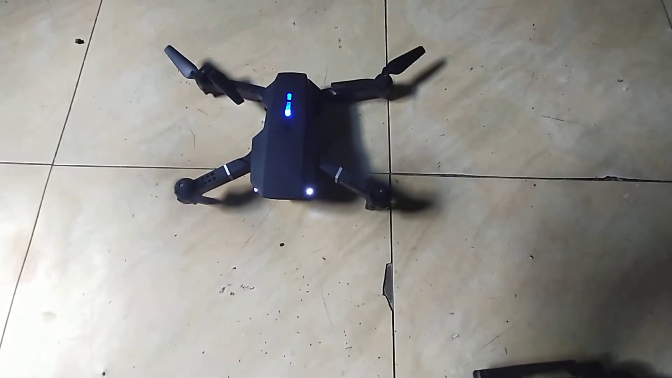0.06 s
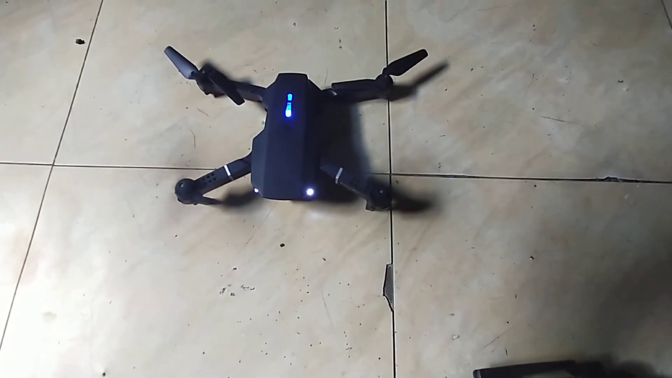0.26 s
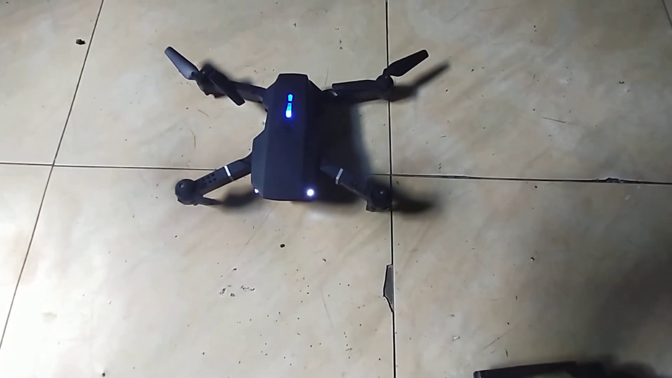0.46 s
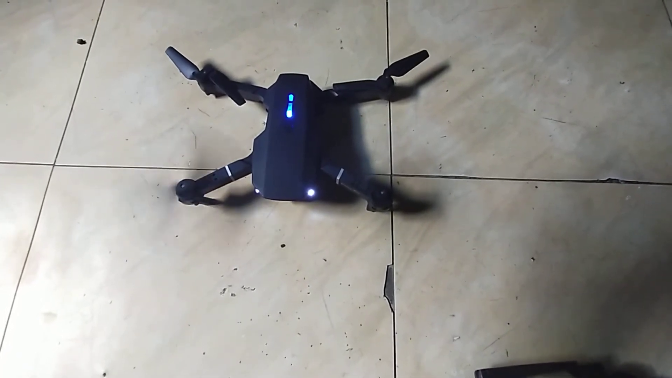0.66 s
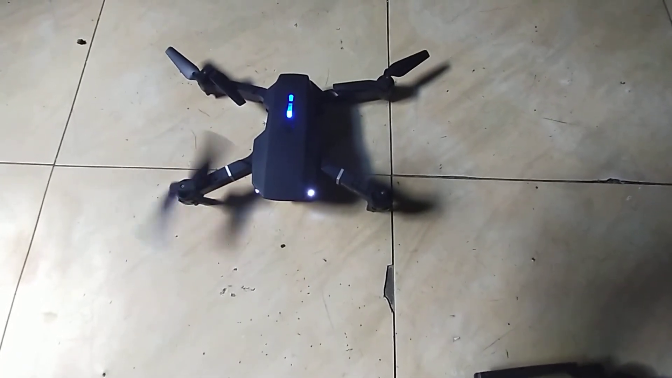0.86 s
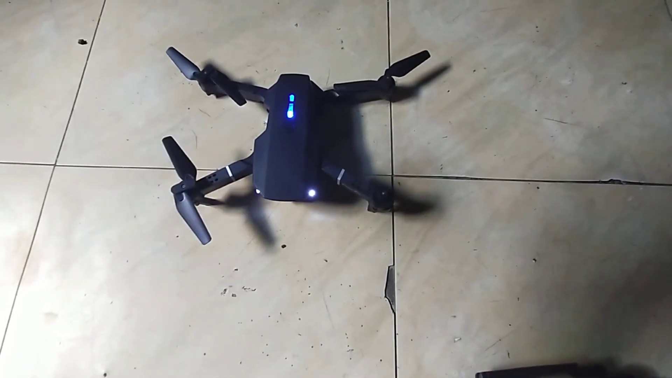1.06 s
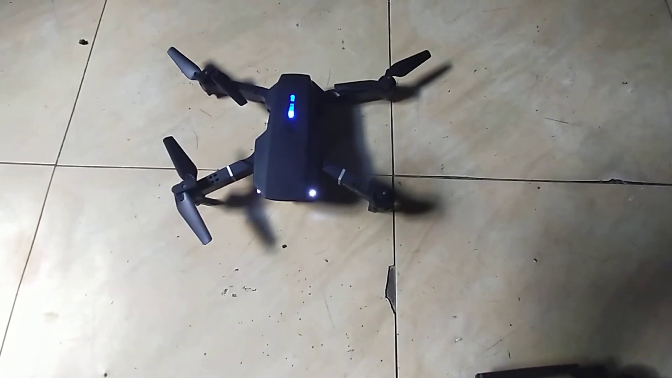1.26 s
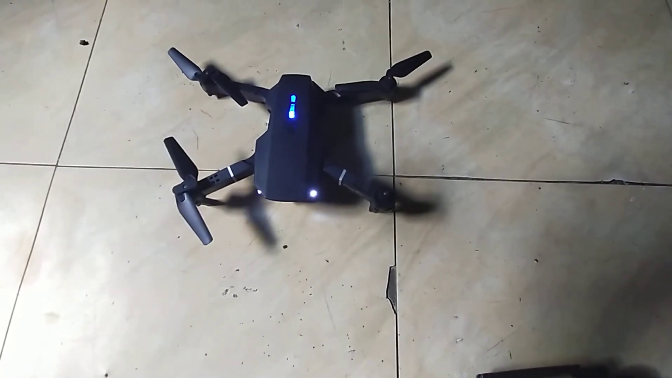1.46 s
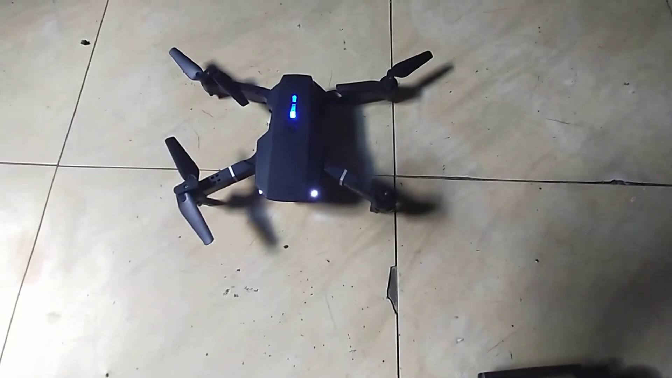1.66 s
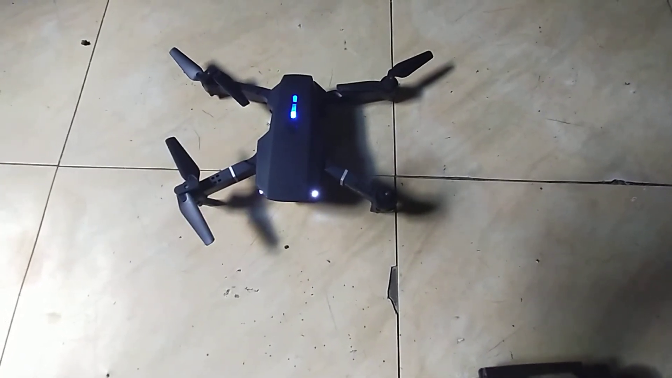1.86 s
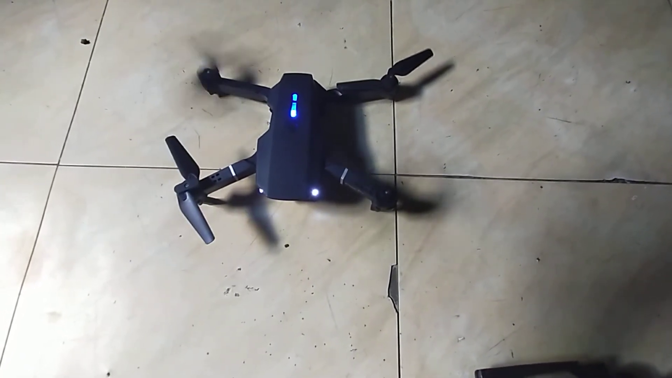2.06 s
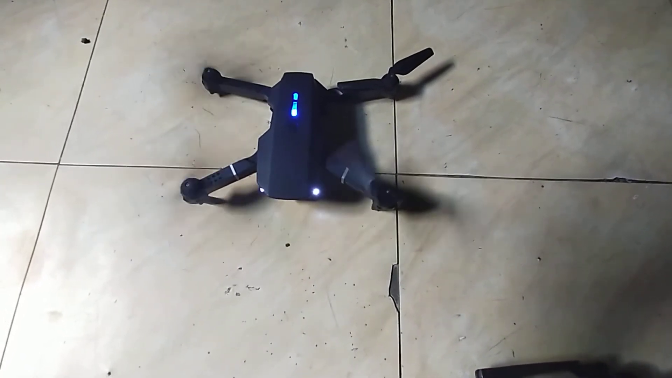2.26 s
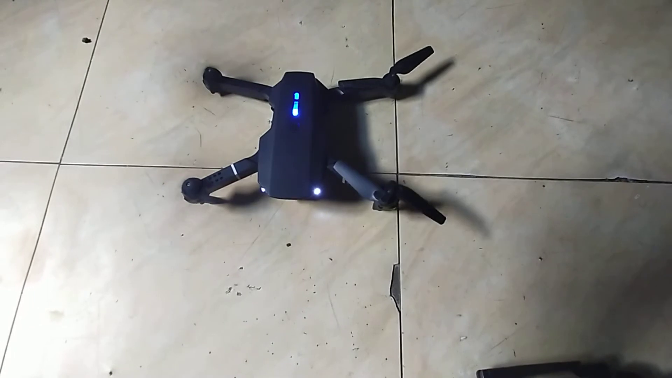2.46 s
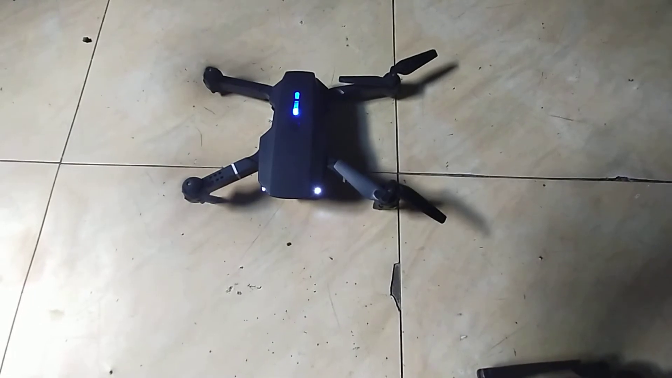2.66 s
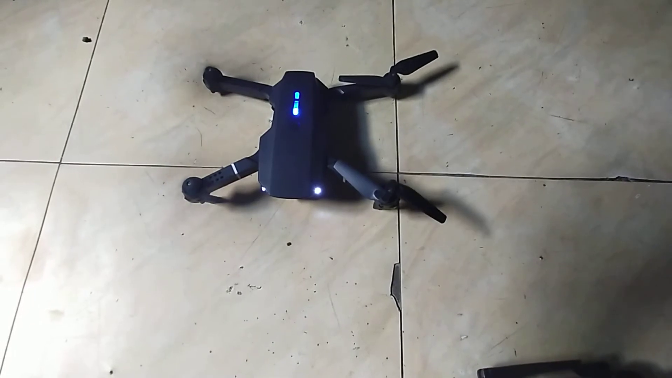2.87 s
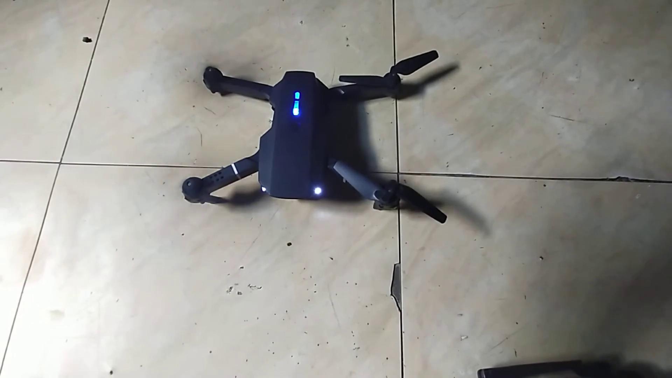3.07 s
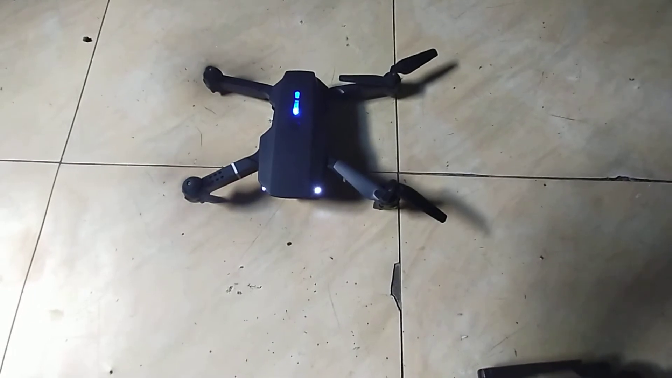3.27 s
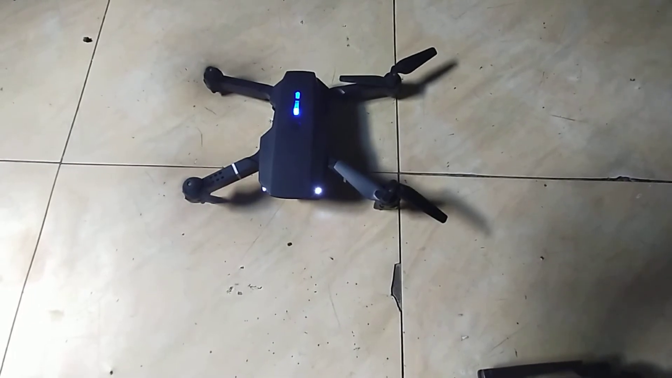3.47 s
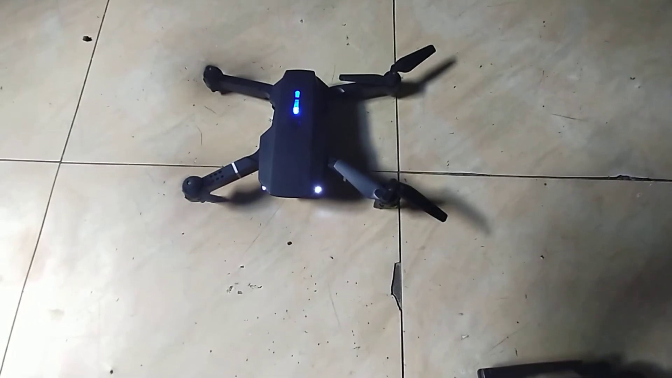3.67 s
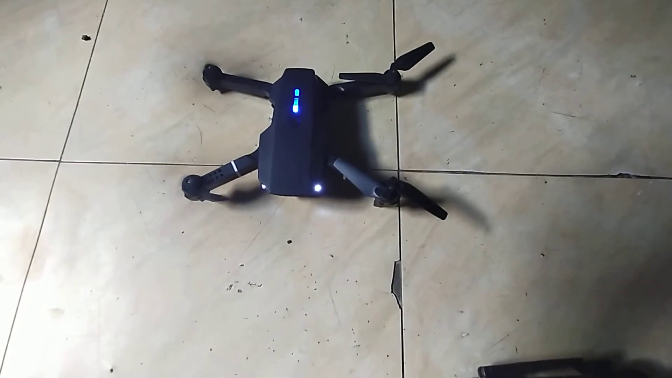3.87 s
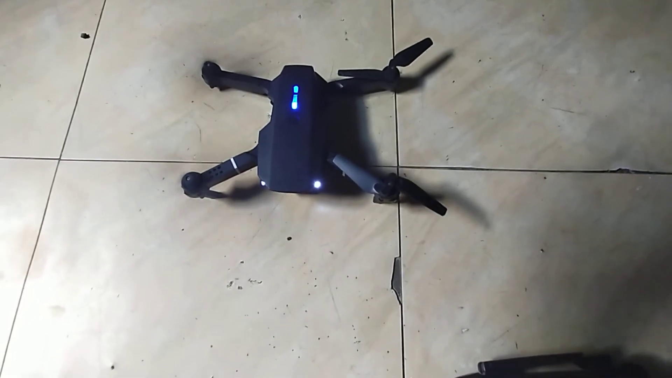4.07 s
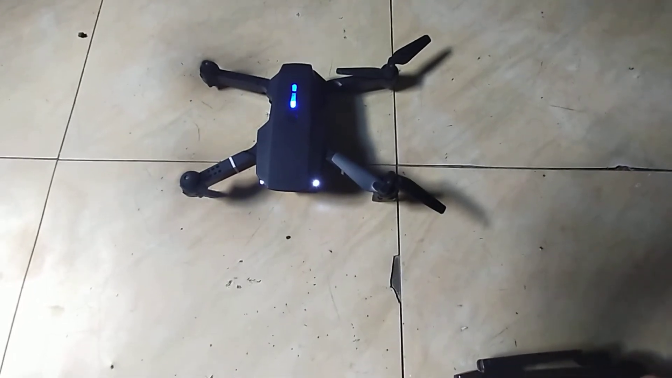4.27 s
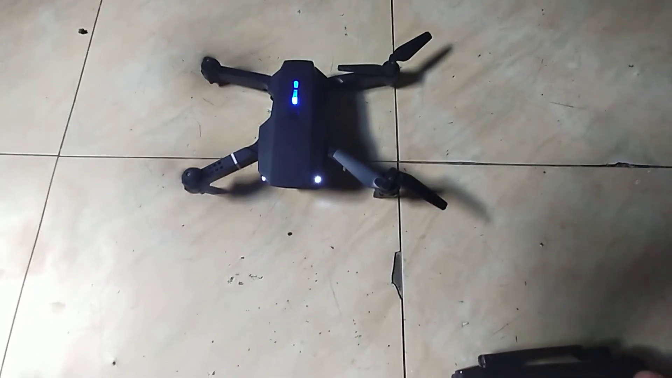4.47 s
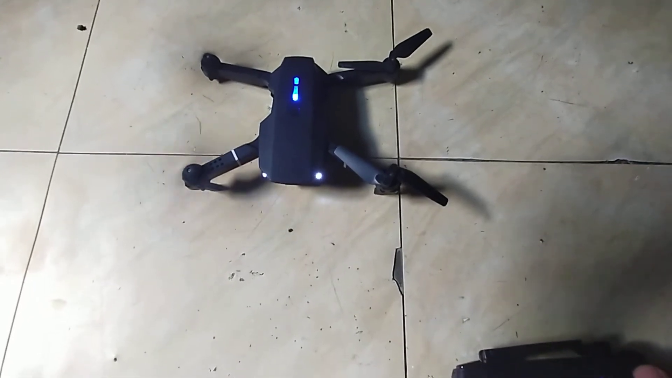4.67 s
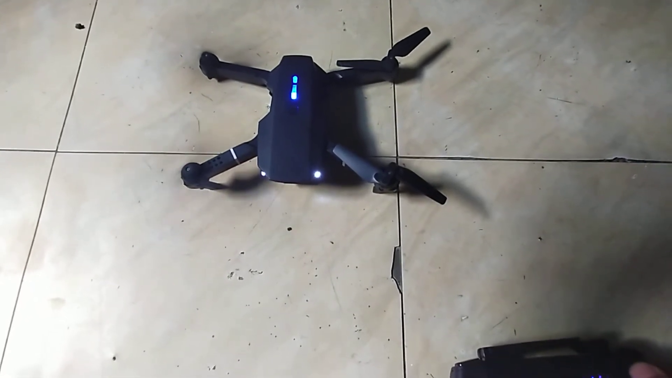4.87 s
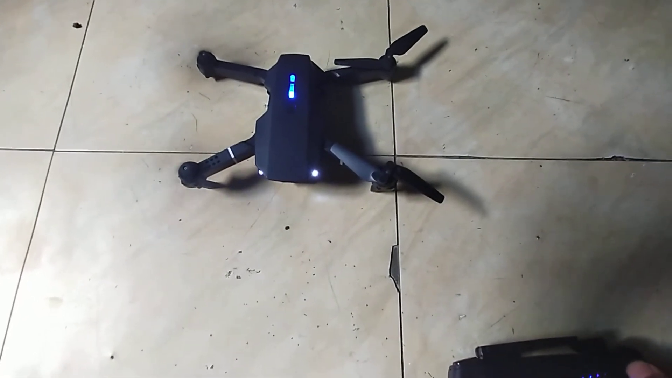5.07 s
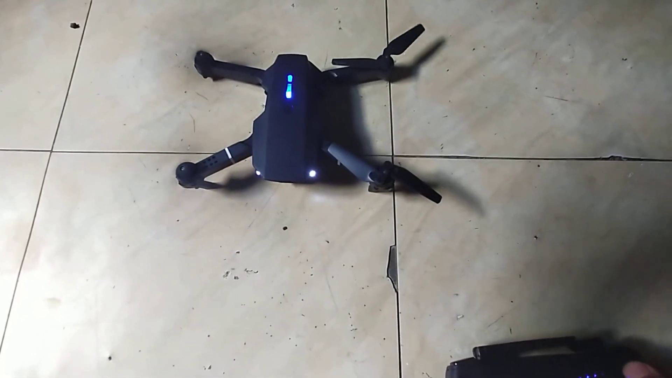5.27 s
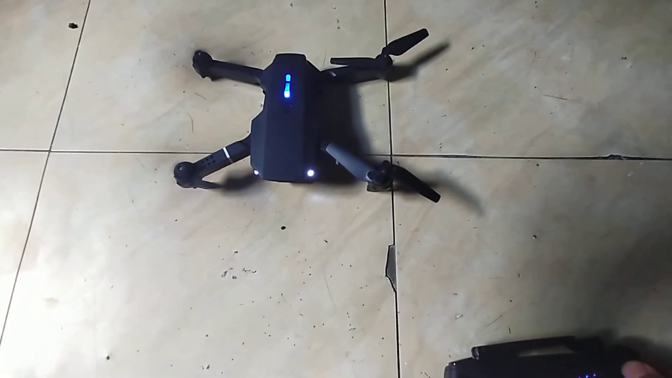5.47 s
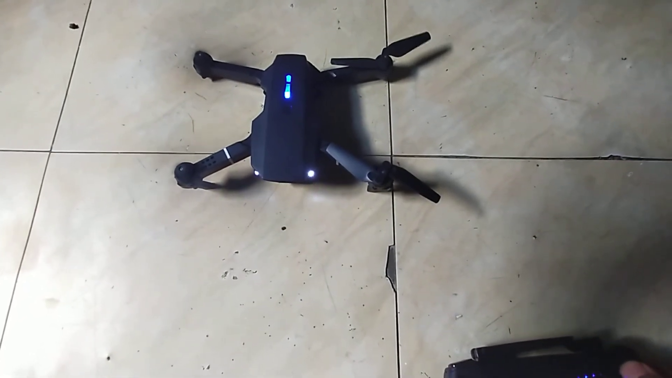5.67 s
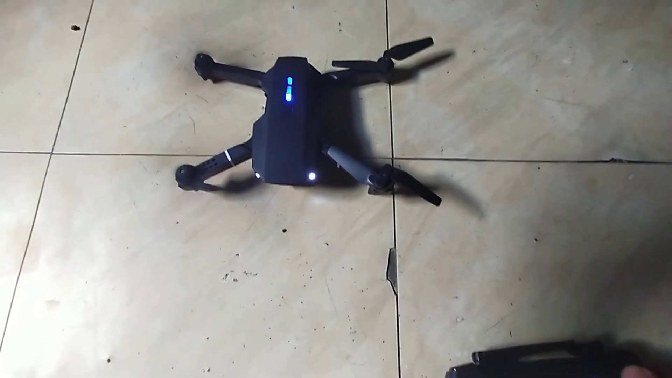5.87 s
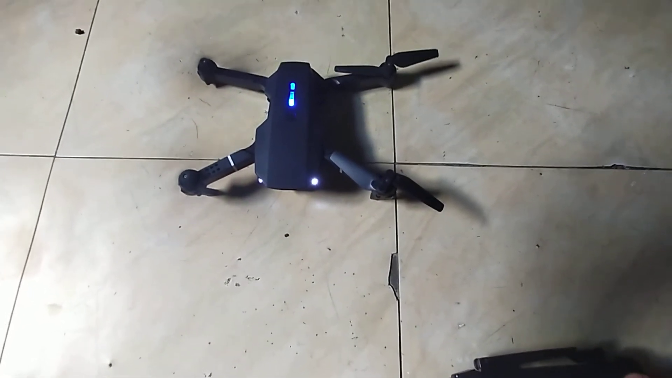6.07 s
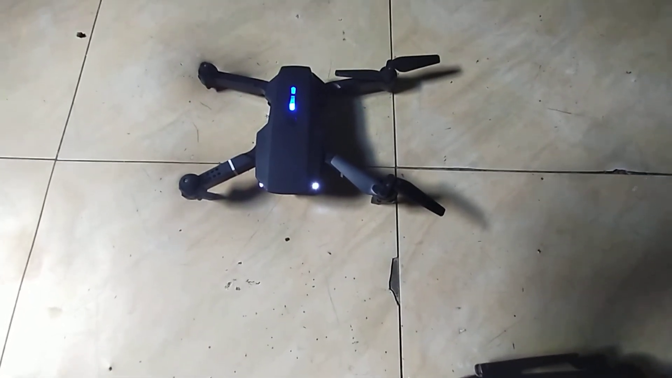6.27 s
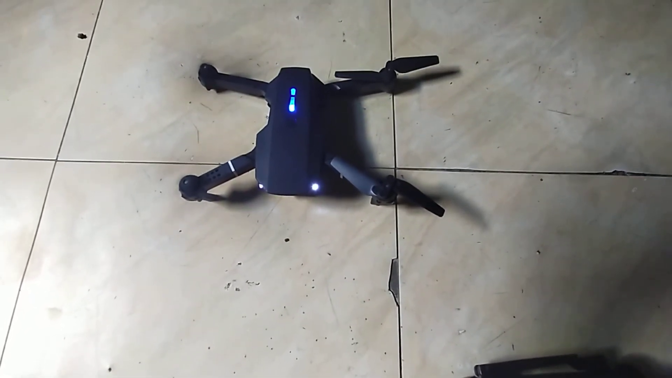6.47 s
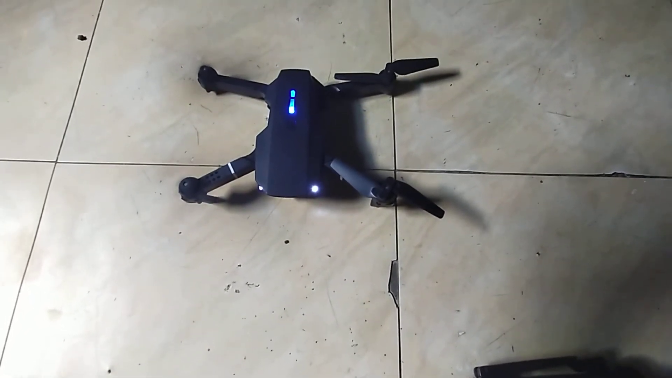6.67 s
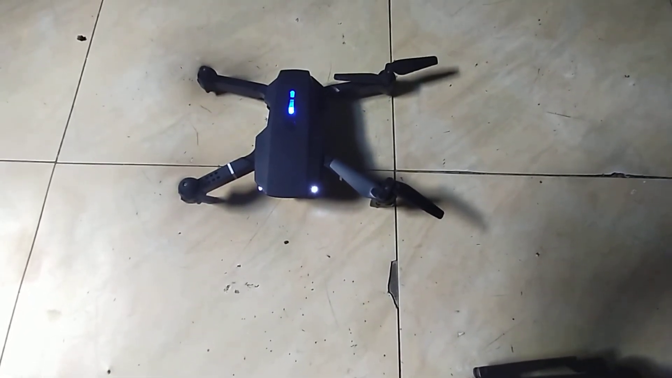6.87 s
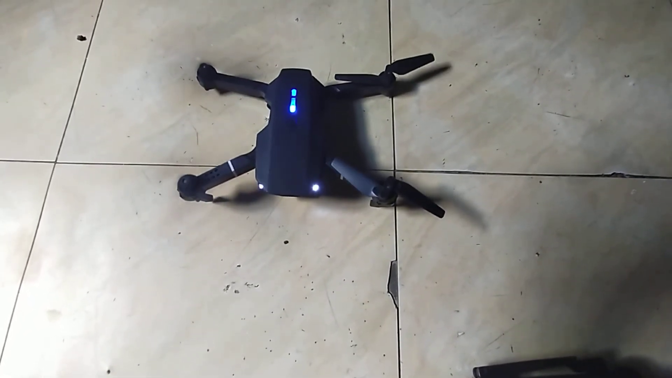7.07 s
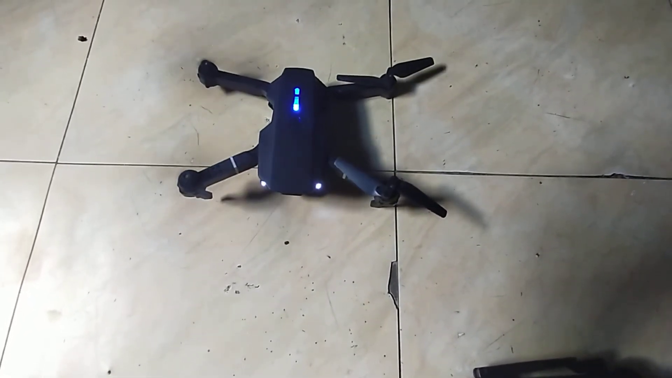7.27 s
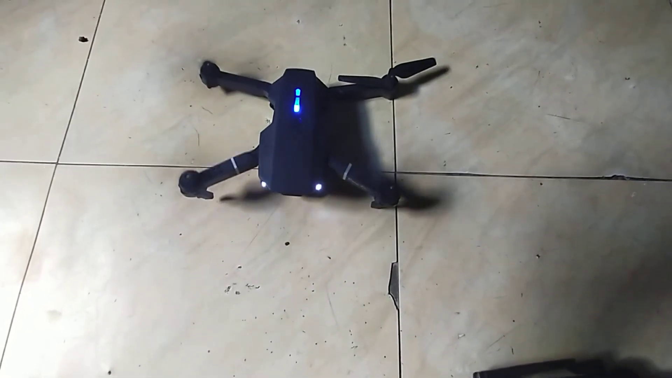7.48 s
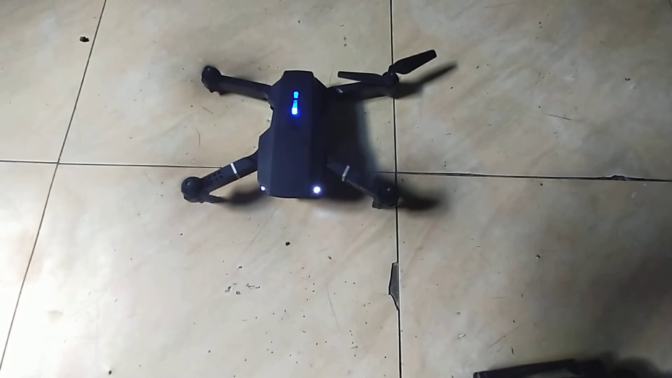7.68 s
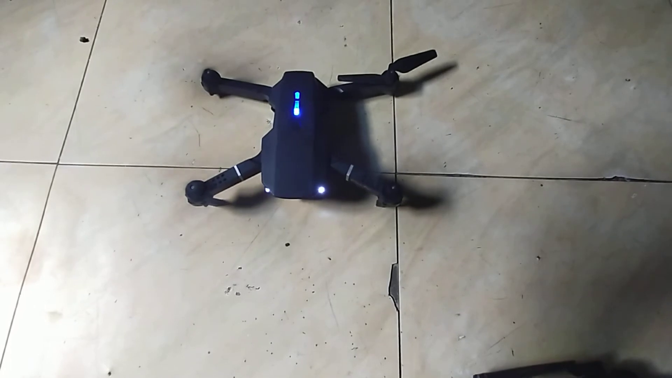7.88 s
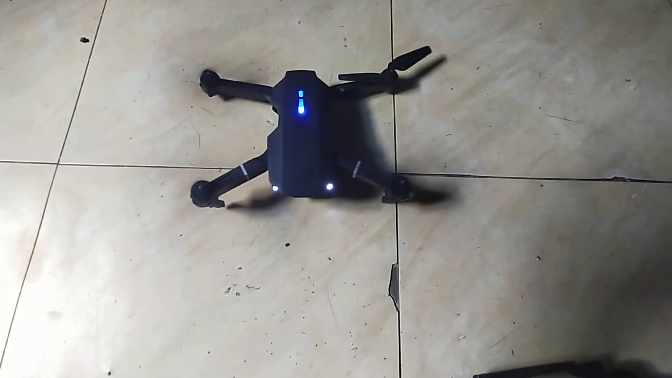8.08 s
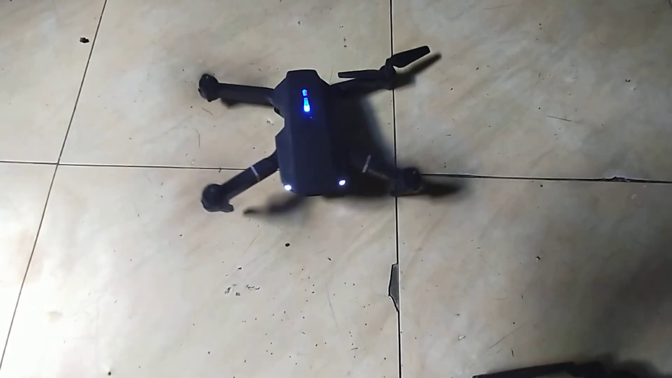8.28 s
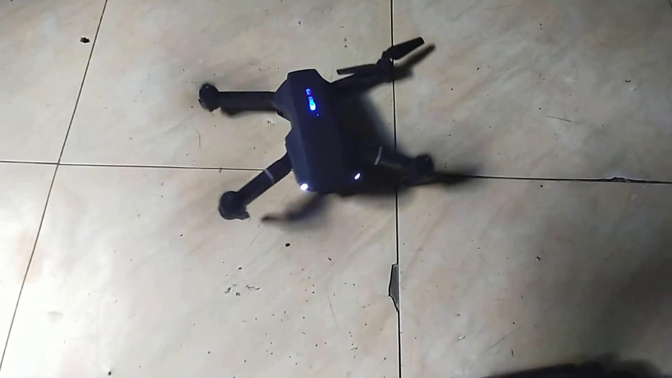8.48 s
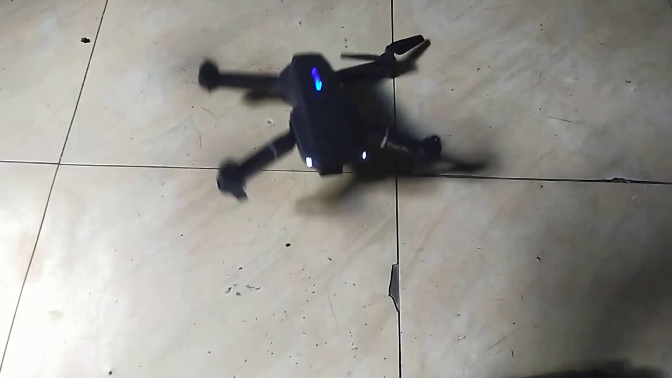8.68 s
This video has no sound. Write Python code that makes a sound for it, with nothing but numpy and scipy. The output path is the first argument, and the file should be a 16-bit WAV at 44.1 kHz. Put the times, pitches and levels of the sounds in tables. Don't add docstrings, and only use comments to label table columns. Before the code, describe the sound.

A small plastic quadcopter on a tiled floor, heard close and dry over faint room hum. From 0 s a geared rotor loses power, its nasal whine sliding down unevenly amid gritty rattle and crackle; by 1.6 s it is loose, slow and faint, with a tiny tick near 1.9 s, nearly silent at 2.1. At 2.2 s hard plastic knocks and short pings burst as a stalled rotor jerks, breaking free at 2.36 and clicking at 2.4. It whirs up fast, peaks near 2.7, sags, and from 3.5 to 5 s holds a rough, throbbing buzz with sizzling highs and a thin fuzzy whistle stuttering above. From 5 s it climbs in steps, steadies around 6.4 to 6.9, then rises strongly to 7.5. At 7.6 it winds down while a third rotor jumps in; a fourth joins at 7.9, racing upward with air wash until the abrupt end at 8.7.

```python
import sys
import numpy as np
from scipy import signal
from scipy.fft import rfft, irfft, next_fast_len
from scipy.io import wavfile
from scipy.ndimage import map_coordinates

SR = 44100
rng = np.random.default_rng(int(sys.argv[2]) if len(sys.argv) > 2 else 0)


def int16_out(signal):
    q = np.round(np.clip(np.atleast_2d(signal).T, -1, 1) * 32767)
    wavfile.write(sys.argv[1], SR, q.astype(np.int16))


def linear_from_db(decibels):
    return 10 ** (np.asarray(decibels, float) / 20)


N = 385434

# (pinion [dB], commutator [dB], second whine [dB], grind [dB])
VOICES = [
    (-62, -39, -42, -7.5),
    (-57.5, -46, -43, -6.5),
    (-59.5, -35.5, -32.5, -6),
    (-54.5, -47.5, -37, -8.5),
]
# (multiple of the rotor [1], level [dB])
COMMUTATOR = [(19, -8), (20, 2), (21, -23)]
# (frequency [Hz], gain [dB])
COMMUTATOR_PATH = [(900, -60), (1080, -19), (1170, -17.5), (1300, 3), (1380, -1), (1500, -3.5),
                   (1580, -15.5), (1750, -10)]
# (multiple of the rotor [1], level [dB])
WORN_GEAR = [(27, -25), (28, -6), (29, -45)]
# (multiple of the rotor [1], level [dB])
DOUBLE_MESH = [(60, -9), (63, -11), (64, 0), (65, -13), (68, -6)]


def unit(x):
    return x / np.sqrt(np.mean(x ** 2) + 1e-20)


def along(points, hz):
    f, v = np.transpose(points)
    return np.interp(np.log(hz + 1), np.log(f + 1), v)


def curves(rows):
    s, *cols = np.transpose(rows)
    return [np.interp(np.arange(N) / SR, s, c) for c in cols]


def wobble(rate):
    knots = rng.standard_normal(int(N * 400 / SR) + 4)
    return map_coordinates(knots, [np.arange(N) * min(rate, 399) / SR], order=1)


def filtered(x, response):
    m = next_fast_len(N + 8192)
    return irfft(rfft(x, m) * response(np.fft.rfftfreq(m, 1 / SR)), m)[:N]


def turn(turns, orders, drift_db, count=60):
    steps = 1024
    k, db = np.transpose(orders)
    lines = np.zeros((count, steps // 2 + 1), complex)
    phase = np.exp(2j * np.pi * rng.random(len(k)))
    lines[:, k.astype(int)] = linear_from_db(db + drift_db * rng.standard_normal((count, len(k)))) * phase
    wave = irfft(lines, steps) * steps / np.sqrt(2)
    wave = np.c_[wave, wave[:, 0]]
    moment = np.arange(len(turns)) * (count - 1) / N
    return map_coordinates(wave, [moment, turns % 1 * steps], order=1)


def sing(turns, voices):
    return sum(linear_from_db(db) * turn(turns, orders, drift_db=0.8) for db, orders in voices)


def motor(rows, slots, slot_path, upper, path, voice):
    # (multiple of the rotor [1], level [dB])
    blade = [(1, -30.5), (2, -3.5)]
    pinion = [(4, 2.5), (6, -9), (8, -21), (12, -11)]
    mesh = [(32, 0)]
    runout = [(29, -14), (30, -15), (31, -2), (33, -11)]
    shake = [(24, -3.5), (36, 2)]
    brushes = [(3, 9), (5, 6.5), (6, 19), (8, 11), (12, 1), (16, 4), (24, 5.5), (25, 1), (28, 2.5),
               (29, 1.5), (36, -1), (37, 3.5), (39, 1.5), (40, 2), (44, -1.5), (48, 4), (56, 4), (64, 13)]

    t = np.arange(N) / SR
    on = np.clip(np.minimum(t - rows[0][0] + 0.02, rows[-1][0] + 0.099 - t) / 0.023, 0, 1)
    span = on > 0
    speed, blade_db, mesh_db = np.array(curves(rows))[:, span]
    turns = np.cumsum(speed * (1 + 0.001964 * wobble(30)[span])) / SR

    pinion_db, slot_db, upper_db, grind_db = voice
    idle_db = 0.88 * np.minimum(mesh_db + 53.5, 0)
    pinion_db = pinion_db + 0.41 * (blade_db + 51.5)
    slot_db = slot_db + idle_db + along(slot_path, 20 * speed)
    loudest = max(upper, key=lambda pair: pair[1])[0]
    upper_db = upper_db + idle_db + along(path, loudest * speed) + 3.5 * wobble(70)[span]
    runout_db = mesh_db - 0.35 * np.maximum(speed - 78, 0)
    shake_hz, shake_width_hz = 62.1, 2.45
    shake_db = -44.5 + idle_db - 6 * ((speed - shake_hz) / shake_width_hz) ** 2

    hum = sing(turns, [(blade_db, blade), (pinion_db, pinion)])
    whine = sing(turns, [(shake_db, shake), (slot_db, slots), (mesh_db, mesh),
                         (runout_db, runout), (upper_db, upper)])
    push = np.clip(np.gradient(speed) * SR / 150, 0, 1)
    whine = whine * linear_from_db(push * (6 * np.cos(2 * np.pi * turns) + 3 * wobble(60)[span] - 3))

    teeth = [(k, 2.5 * (k % 4 == 0 and k > 72)) for k in range(3, 140) if k not in (31, 32)]
    brush_db = idle_db - 0.34 * np.maximum(speed - 75.2, 0)
    grind = turn(turns, teeth, drift_db=4.5) + linear_from_db(brush_db) * turn(turns, brushes, drift_db=5.0)
    grind = grind * linear_from_db(grind_db + idle_db / 3 + 0.151 * (speed - 61.5))

    tight = 3.0 * (60 / speed) ** 3.03 * np.cos(2 * np.pi * turns + 0.13)
    beat = tight + 3.2 * np.cos(4 * np.pi * turns + 3.5) + 3.3 * np.cos(8 * np.pi * turns + 1.9)
    out = np.zeros((5, N))
    out[:, span] = hum, whine, grind, beat, linear_from_db(blade_db)
    return on * out


def coasting_rotor():
    # (time [s], rotor speed [Hz], blade thrust [dB], gear load [dB])
    coasting = [(0.0, 80.15, -46.5, -41.5), (0.2, 74.94, -52, -39.5), (0.334, 64.66, -66, -35.5),
                (0.448, 59.8, -62, -42), (0.646, 54.66, -70, -33), (0.786, 50.1, -64, -42),
                (1.102, 46.92, -69, -39.5), (1.292, 47.6, -72, -42.5), (1.45, 45.6, -78, -49),
                (1.62, 40.3, -93, -65),
        (1.899, 37.2, -105, -85),
        (2.152, 33.6, -101, -85),
    ]
    # (frequency [Hz], gain [dB])
    path = [(1100, -10), (1300, -17), (1450, -34), (1700, -66), (2000, -2), (2130, 9.5), (2300, -5.5),
            (2480, -2.5)]
    return motor(coasting, COMMUTATOR, COMMUTATOR_PATH, WORN_GEAR, path, VOICES[0])


def stalled_rotor():
    # (time [s], rotor speed [Hz], blade thrust [dB], gear load [dB])
    stall = [
        (2.21, 38.57, -95, -52.5),
        (2.33, 39.02, -92, -51),
    ]
    spin_up = [(2.36, 33.67, -87, -45.5), (2.442, 55.11, -63, -37.5), (2.504, 66.8, -56, -38),
               (2.62, 74.1, -52, -41.5), (2.7, 75.1, -49, -45), (2.864, 73.56, -54.5, -41),
               (3.094, 68.1, -54, -43.5), (3.344, 60.28, -58, -45.5), (3.5, 58.97, -58, -39)]
    hold_and_climb = [(3.599, 58.6, -55, -42.5), (4.21, 58.74, -56.5, -40.5), (5.02, 59.3, -57.5, -45.5),
                      (5.18, 63.37, -59, -49), (5.301, 67.6, -53, -43), (5.38, 70.04, -48.5, -42),
                      (5.51, 71.4, -52, -42.5), (5.669, 72.6, -53, -48), (5.87, 74.7, -52, -44.5),
                      (6.01, 77.75, -51, -54.5), (6.381, 80.7, -49, -51), (6.87, 80.14, -49, -56),
                      (6.95, 82.35, -47, -40), (7.0, 85.9, -43.5, -48), (7.282, 94.7, -40.5, -34.5),
                      (7.411, 100.6, -40, -31.5), (7.541, 102.8, -44.5, -38.5), (7.575, 99.1, -41, -31)]
    power_off = [
        (7.61, 92.7, -40.5, -72),
        (7.819, 70.66, -51, -80),
        (7.97, 61.46, -62, -85),
        (8.3, 57.1, -62, -93),
    ]
    # (multiple of the rotor [1], level [dB])
    slots = [(19, -13), (20, 1.5), (21, -11), (24, -6.5)]
    # (frequency [Hz], gain [dB])
    slot_path = [(900, -22), (1170, -13.5), (1300, 0), (1385, -12), (1425, 1), (1550, 0), (1610, -11),
                 (1750, -27)]
    path = [(2200, -15), (3500, -19), (3750, -4.5), (4000, -37), (5200, -16), (6000, -4), (6450, 1.5)]
    return motor(stall + spin_up + hold_and_climb + power_off, slots, slot_path, DOUBLE_MESH, path, VOICES[1])


def third_rotor():
    # (time [s], rotor speed [Hz], blade thrust [dB], gear load [dB])
    run = [(7.685, 44.95, -71, -32), (7.73, 58.65, -65, -40), (7.77, 70.9, -53, -29),
           (7.878, 88.7, -48, -45), (7.996, 87.14, -47, -70), (8.114, 90.05, -55, -58.5),
           (8.272, 82.4, -48, -56.5), (8.39, 81.15, -43.5, -60), (8.7, 80.85, -52.5, -60.5)]
    # (frequency [Hz], gain [dB])
    path = [(1200, 1), (1600, -9), (2100, -10), (2300, -2.5), (2480, -2)]
    return motor(run, COMMUTATOR, COMMUTATOR_PATH, WORN_GEAR, path, VOICES[2])


def fourth_rotor():
    # (time [s], rotor speed [Hz], blade thrust [dB], gear load [dB])
    run = [(7.9, 78.3, -67, -63), (8.0, 83.2, -63, -51), (8.14, 88.25, -41.5, -42), (8.33, 86.8, -60, -41),
           (8.37, 93.6, -53, -45), (8.56, 96, -48.5, -46), (8.62, 104.6, -42, -35), (8.7, 119.4, -50, -36),
           (8.74, 123.7, -35.5, -55)]
    # (multiple of the rotor [1], level [dB])
    slots = [(6, -0.5), (8, 8.5), (23, -14), (24, -19), (25, -12)]
    # (frequency [Hz], gain [dB])
    path = [(5050, -7), (5300, -3), (6100, 1), (7700, 3)]
    return motor(run, slots, COMMUTATOR_PATH, DOUBLE_MESH, path, VOICES[3])


def rings(hz):
    # (centre [Hz], width [Hz], gain [dB])
    resonances = [(416, 31, 7.5), (1157, 177, 7), (1356, 40, 6.5), (1476.5, 46, 8), (1802, 45, 8.5),
                  (2090, 65, 5), (2303.6, 53, 8.5), (3284, 48, 7), (3846, 67, 7.5)]
    return sum(db / (1 + (2 * (hz - c) / w) ** 2) for c, w, db in resonances)


def shell(hz):
    # (frequency [Hz], density [dB per Hz])
    colour = [(60, -54), (130, -10), (300, -16.5), (630, -10), (850, 1.5), (1100, -2), (1500, 4.5),
              (2350, 2), (2500, 4.5), (3700, -3.5), (4300, -4), (5500, -56), (9000, -120)]
    return linear_from_db(along(colour, hz) + rings(hz))


def carried_tones(hum, whine):
    # (frequency [Hz], gain [dB])
    hum_path = [(100, -1.5), (300, 1.5), (400, 0), (450, -3), (560, 3), (700, 5), (1300, -3)]
    whine = filtered(whine, lambda hz: linear_from_db(1.1 * rings(hz) - 4))
    hum = filtered(hum, lambda hz: linear_from_db(0.95 * rings(hz) + along(hum_path, hz)))
    return hum + whine


def sparks(depth_db, rate):
    return unit(linear_from_db(depth_db * wobble(rate)) * rng.standard_normal(N))


def band(x, spectrum):
    return unit(filtered(x, lambda hz: linear_from_db(along(spectrum, hz))))


def rattle(grind, beat_db, crackle_db):
    # (time [s], level [dB], brightness [dB])
    levels = [(0.0, -35.5, 1.5), (0.8, -40.5, 0), (1.3, -44, 0), (1.65, -51, -0.5), (2.1, -64, -11),
              (2.175, -60, -2), (2.2, -40.5, -1), (2.245, -39.5, 3.5), (2.29, -51.5, -1),
              (2.36, -34.5, 1.5), (2.9, -34.5, 0), (4.05, -38.5, 4.5), (5.0, -40, 1), (5.3, -34.5, -0.5),
              (5.9, -33.5, 0), (7.0, -32.5, -0.5), (7.7, -32, 0), (8.74, -32, -2)]
    # (time [s], level over the rattle [dB])
    loose = [
        (.3, -5),
        (.8, -5.5),
        (1.6, -3.5),
        (2.16, -11),
        (2.2, -43),
    ]
    # (frequency [Hz], density [dB per Hz])
    sizzle_colour = [(2180, -28), (3700, 2.5), (3870, -5), (4140, -25), (4380, 0), (4800, -1), (5420, 0),
                     (5920, -2.5), (6770, 0), (7010, 4.5), (7440, 7), (8010, 4), (8600, -34), (11200, -55),
                     (18900, -120)]
    fizz_colour = [(4710, -58), (8000, -19), (8420, -3), (9040, -6.5), (10500, -7.5), (11400, -10.5),
                   (14000, -12.5)]
    top_colour = [(7940, -40), (13500, -10.5), (15100, -3.5), (15700, 2)]

    shell_db, bright_db = curves(levels)
    sizzle_db = -6.5 + 0.73 * bright_db
    fizz_db = -18 + 1.3 * bright_db
    top_db = -13 + 1.6 * bright_db + crackle_db
    grind = 0.75 * grind / np.sqrt(140)

    body = unit(filtered(grind + linear_from_db(1.1 * beat_db) * sparks(1.5, 300), shell))
    sizzle = band(linear_from_db(1.5) * grind + linear_from_db(0.68 * beat_db) * sparks(1, 350), sizzle_colour)
    spits_db = 0.65 * wobble(43)
    fizz = band(linear_from_db(0.34 * beat_db + spits_db) * sparks(2.0, 380), fizz_colour)
    top_swing_db = 0.8 * beat_db + 0.5 * spits_db + 2.5 * wobble(70)
    top = band(linear_from_db(top_swing_db) * sparks(4, 200), top_colour)
    highs = linear_from_db(sizzle_db) * sizzle + linear_from_db(fizz_db) * fizz + linear_from_db(top_db) * top

    knocking = linear_from_db(beat_db) * rng.standard_normal(N)
    hollow = unit(filtered(knocking, lambda hz: (hz > 1000) * shell(hz) * linear_from_db(2 * rings(hz))))
    return linear_from_db(shell_db) * (linear_from_db(-4.5) * body + highs + linear_from_db(curves(loose)[0]) * hollow)


def knocks():
    # (time [s], peak [dB], ping frequency [Hz], ping level [dB])
    jerks = [
        (1.894, -41, 5160, -16),
        (1.92, -40, 5260, -23),
        (2.188, -28, 7310, -2),
        (2.212, -13, 7050, -24),
        (2.234, -24, 7120, 4),
        (2.239, -22, 7460, -14),
        (2.357, -16.5, 6000, 3),
        (2.408, -26, 7300, 11),
    ]
    out = np.zeros(N + SR)
    t = np.arange(SR // 20) / SR
    for s, db, hz, ping_db in jerks:
        crack = linear_from_db(-4.0 - 60 * t / 0.039) * rng.standard_normal(len(t)) * np.minimum(t / 0.00097, 1)
        ping = linear_from_db(ping_db - 60 * t / 0.02) * np.sin(2 * np.pi * hz * t) * np.minimum(t / 0.00084, 1)
        out[round(s * SR):][:len(t)] += linear_from_db(db - 7.5) * (crack + ping)
    return filtered(out[:N], lambda hz: 1 / (1 + (600 / (hz + 1)) ** 4) / (1 + (hz / 8500) ** 2))


def top_spells():
    # (time [s], length [s], crackle [dB], whistle [dB])
    spells = [(-0.1, 3, 7, -20), (2.283, 0.6, -10, 5), (4.259, 0.32, 10, -16), (4.64, 0.73, -1, 0.5),
              (5.449, 0.77, 8.5, 1), (6.3, 0.95, -1, 2), (7.33, 0.278, 5, -18), (7.78, 0.46, 6, -14),
              (8.26, 0.39, -16, 3), (8.643, 0.2, 2, -14)]
    t = np.arange(N) / SR
    edge_s = 0.04
    gains = np.zeros((2, N))
    for s, length, crackle_db, whistle_db in spells:
        inside = np.clip(np.minimum(t - s, s + length - t) / edge_s + 0.5, 0, 1)
        gains += np.outer([crackle_db, whistle_db], inside)
    return gains


def chopper(whistle_db):
    on = np.arange(N) > 2.27 * SR
    fuzz = filtered(rng.standard_normal(N), lambda hz: 1 / (1 + ((hz - 10500) / 260) ** 4))
    return on * linear_from_db(-64 + whistle_db + 0.62 * wobble(43)) * unit(fuzz)


def wash(flow):
    # (frequency [Hz], density [dB per Hz])
    colour = [(25, -70), (60, -36), (100, -4.5), (150, -3), (400, -9), (800, 2), (1300, -5), (4000, -120)]
    gusts = linear_from_db(2.5 * wobble(60)) * rng.standard_normal(N)
    return linear_from_db(-5) * flow * band(gusts, colour)


def room():
    # (frequency [Hz], density [dB per Hz])
    colour = [(15, -53), (25, -23), (37, -32), (107, 0.5), (228, 4), (637, -9.5), (1390, 6.5), (1590, -5),
              (2090, -2), (4570, -18), (7630, -18), (10300, -29), (15800, -7.5)]
    return linear_from_db(-57.5) * band(rng.standard_normal(N), colour)


def scene():
    rotors = coasting_rotor() + stalled_rotor() + third_rotor() + fourth_rotor()
    hum, whine, grind, beat_db, flow = rotors
    beat_top_db = 5.5
    beat_db = beat_top_db * np.tanh(beat_db / beat_top_db)
    crackle_db, whistle_db = top_spells()
    drone = carried_tones(hum, whine) + rattle(grind, beat_db, crackle_db) + knocks()
    drone = drone + chopper(whistle_db) + wash(flow)
    return np.tile(drone + room(), (2, 1))


def band_limit(x):
    return signal.sosfilt(signal.butter(12, 17120, fs=SR, output="sos"), x)


def record(dry):
    mono = filtered(dry[0], lambda hz: hz < 15720)
    return band_limit(np.array([mono, mono]))


dry = scene()
out = record(dry)
int16_out(out)
```